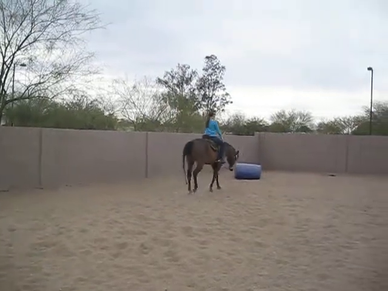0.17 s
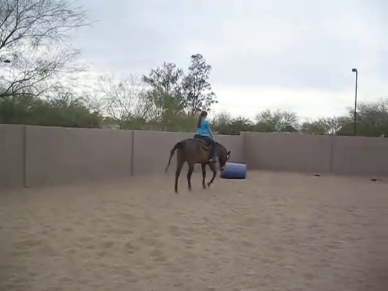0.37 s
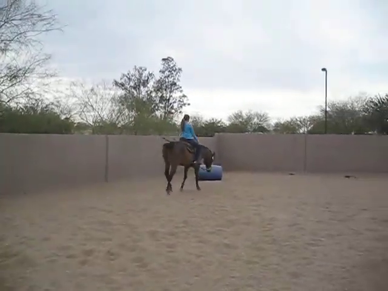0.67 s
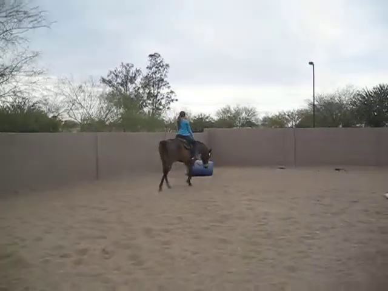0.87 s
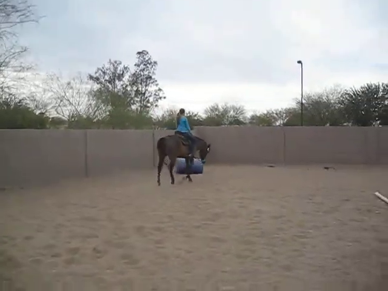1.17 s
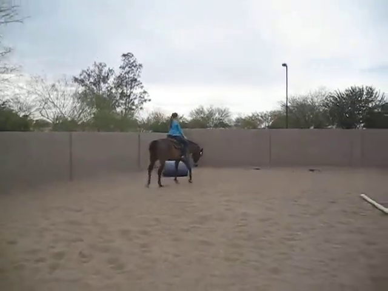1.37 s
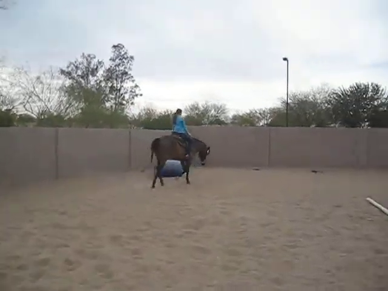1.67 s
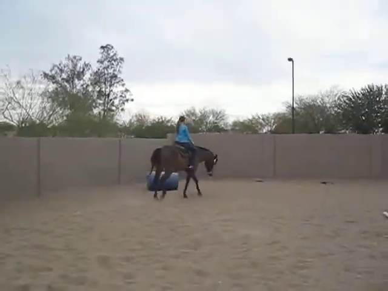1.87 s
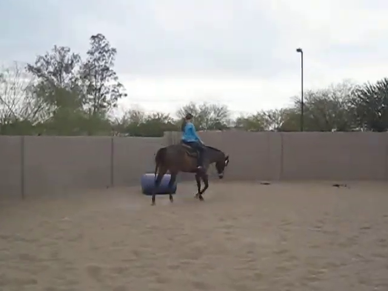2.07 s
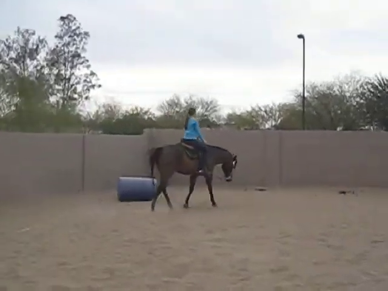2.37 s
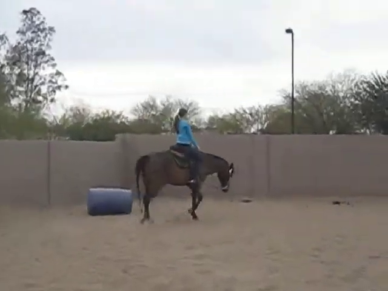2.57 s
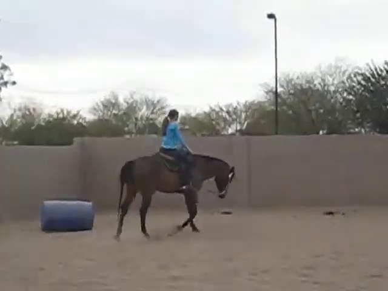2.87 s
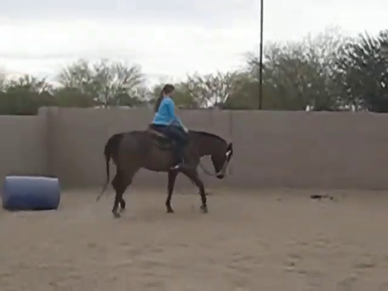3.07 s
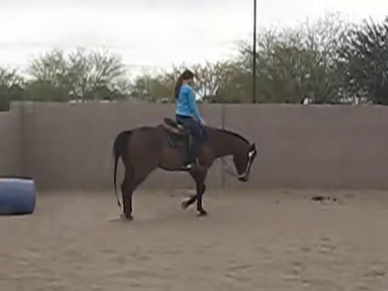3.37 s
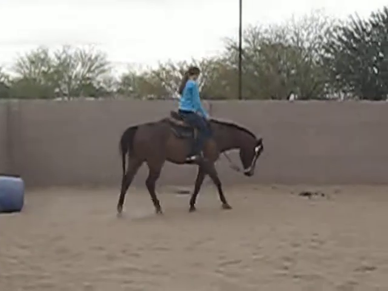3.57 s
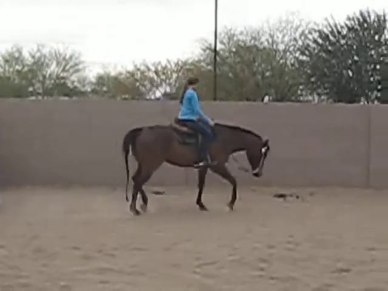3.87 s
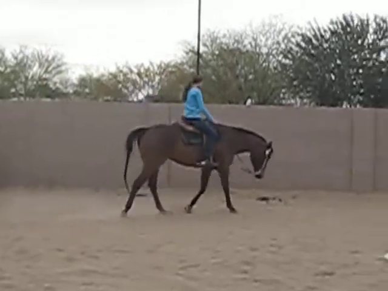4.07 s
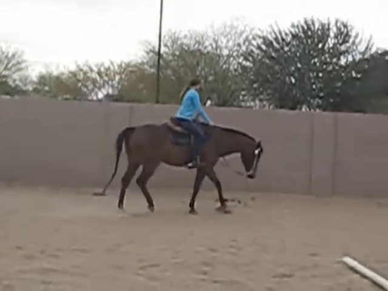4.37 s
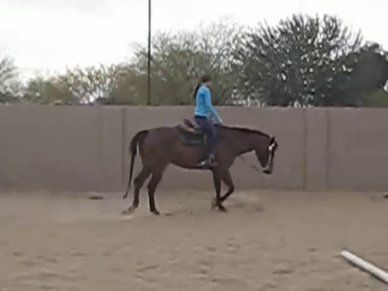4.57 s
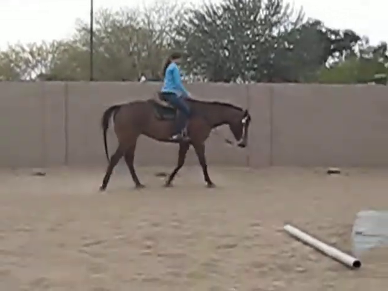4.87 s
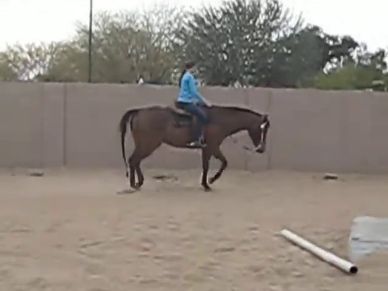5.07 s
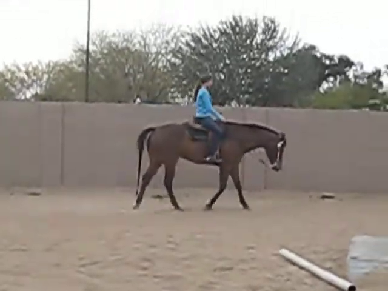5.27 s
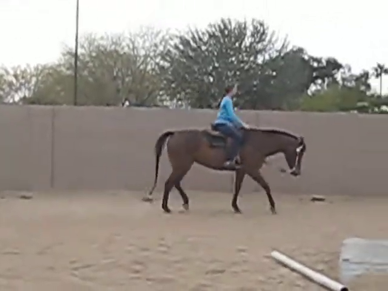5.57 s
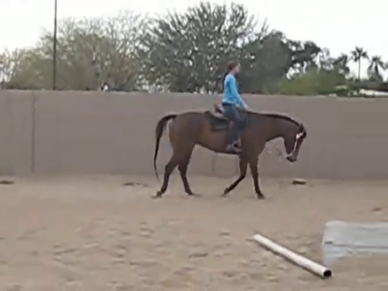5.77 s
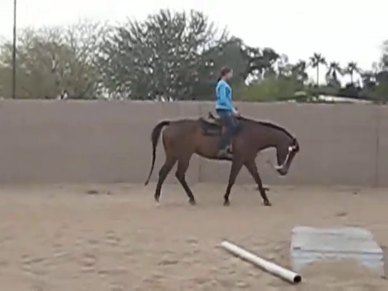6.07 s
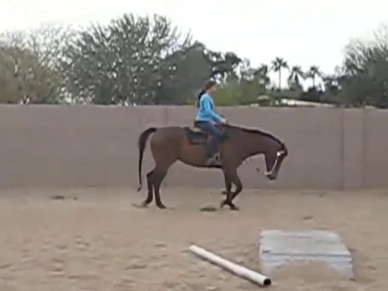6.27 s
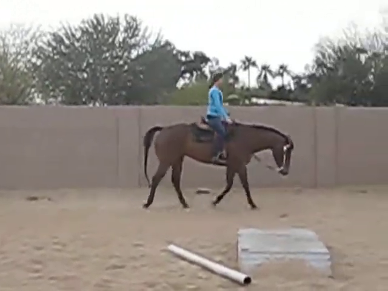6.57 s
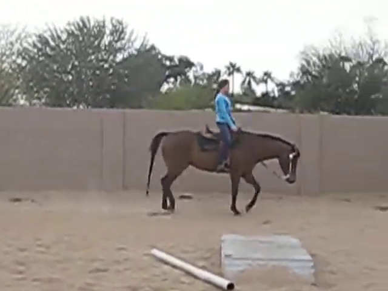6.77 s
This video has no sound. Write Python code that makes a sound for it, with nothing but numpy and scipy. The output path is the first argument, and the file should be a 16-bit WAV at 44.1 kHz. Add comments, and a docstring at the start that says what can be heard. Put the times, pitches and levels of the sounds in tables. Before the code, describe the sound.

A distant horse walks on sand, heard as small, uneven bursts of grainy hiss with little hoof thud, over a smooth, gently swelling far road roar. From 0.2 s low wind pushes flutter on the hand-held microphone, strongest around 0.5 and 1 s. Between 1 and 1.8 s a sleeve rubs close by in dry, dense grains, with light ticks and a hard plastic double snap at 1.53 s. Crisper sand scuffs resume from 1.9 s; a faint high chirp comes at 2.2 s. At 3.01 s a small snap precedes the loudest sharp clacks at 3.04 s, leaving a thin metallic spring ring. Four short buzzy bird whistles fall between 3.65 and 4.07 s, with two much fainter ones near 5.4 and 5.6 s. Fine grit crackles at 4.3-4.7 s. Scuffs stand out at 4.05, 5.13 and 5.48 s. Wind buffets again from 5.5 to about 6.6 s, then quiet steps and road remain until 6.9 s.

```python
"""A horse walks on a sand arena, far from a hand-held camera: bursts of grainy noise, over filtered road roar.
From 0.2 s gusts buffet the microphone as short low pushes with noisy wakes; they return near 5.5 s.
At 1 to 1.8 s a sleeve rustles close by as dense grains; light ticks fall, the housing snaps as ringing modes.
At 2.2 s a faint high chirp; at 3 s harder snaps and a ringing spring; to 5.6 s a bird's buzzes and whistles.
Fine grit crackles underfoot as sparse noise grains, strongest from 4.3 to 4.7 s."""
import sys
import numpy as np
from scipy import signal
from scipy.fft import rfft, irfft, next_fast_len
from scipy.io import wavfile
from scipy.ndimage import uniform_filter1d

SR = 44100
rng = np.random.default_rng(int(sys.argv[2]) if len(sys.argv) > 2 else 0)


def store_pcm(level_fs):
    """Save levels as 16-bit WAV."""
    pcm = np.round(np.clip(level_fs, -1, 1) * 32767).astype(np.int16)
    wavfile.write(sys.argv[1], SR, np.atleast_2d(pcm).T)


N = 305613


def amp(db):
    """Amplitude factor of a level in dB."""
    return 10 ** (np.asarray(db) / 20)


def evened(x):
    """Scales a signal to unit RMS."""
    return x / np.sqrt(np.mean(x ** 2) + 1e-20)


def curve(rows):
    """Columns of a table at every sample; the first column is time."""
    s, *columns = np.transpose(rows)
    return [np.interp(np.arange(N) / SR, s, c) for c in columns]


def coloured(x, points):
    """Applies a spectrum given on a log-frequency axis."""
    f, db = np.transpose(points)
    size = next_fast_len(len(x))
    hz = np.fft.rfftfreq(size, 1 / SR)
    gain = amp(np.interp(np.log(hz + 1), np.log(f), db))
    return irfft(rfft(x, size) * gain, size)[:len(x)]


def band(x, lo_hz, hi_hz):
    """Keeps the band between two frequencies."""
    return signal.sosfilt(signal.butter(2, [lo_hz, min(hi_hz, 21000)], "band", fs=SR, output="sos"), x)


def highpass(x, order, hz):
    """Keeps what lies above a frequency."""
    return signal.sosfilt(signal.butter(order, hz, "high", fs=SR, output="sos"), x)


def wobble(hz):
    """Random wander of unit RMS, slower than about the given frequency."""
    f = np.fft.rfftfreq(N, 1 / SR)
    return evened(irfft(rfft(rng.standard_normal(N)) / (1 + (f / hz) ** 4), N))


def gritty(per_s, spread_db, smooth):
    """Noise with grains of uneven size standing out."""
    size = amp(spread_db * np.minimum(rng.exponential(1, N), 4))
    size = size * (rng.random(N) < per_s / SR)
    grains = evened(size * rng.standard_normal(N))
    return evened(grains + smooth * rng.standard_normal(N))


def patchy(x, depth_db):
    """Raises and lowers random patches of time and frequency."""
    z = signal.stft(x, nperseg=512)[2]
    patches = uniform_filter1d(rng.standard_normal(z.shape), size=9, axis=0)
    patches = evened(uniform_filter1d(patches, size=12, axis=1))
    return evened(signal.istft(z * amp(depth_db * patches), nperseg=512)[1][:N])


def split(x, points):
    """Coloured noise as a treble and a lower part, both scaled to bring the treble to unit level."""
    x = coloured(x, points)
    high = highpass(x, 4, 7800)
    return high / high.std(), band(x, 180, 5440) / high.std()


def add(mix, s, sound):
    """Adds a sound into the mix from the given second on."""
    start = round(s * SR)
    part = mix[start:start + len(sound)]
    part += sound[:len(part)]


# distant road: (time [s], level [dB], weight of the part above 1700 Hz [dB])
ROAD_LEVEL = [(0.0, -52, -7), (0.89, -49.5, 2), (1.16, -47, 3.5), (1.87, -48.5, 1), (2.91, -45, -6),
              (3.05, -44, 4.5), (3.2, -42, 2), (3.4, -45, -3), (4.4, -44, 3.5), (5.11, -47.5, 2.5),
              (5.48, -49, 0), (5.79, -47, 5.5), (6.5, -47.5, -3.5), (6.93, -46.5, -9)]
# spectrum of the tyre roar: (frequency [Hz], density [dB])
ROAD_SPECTRUM = [(30, -24), (80, -15), (170, -10), (330, -18.5), (520, -3.5), (740, -1.5), (930, 0.5),
                 (1150, -4.5), (2100, -8), (2700, -12.5), (3500, -19.5), (6400, -28), (15000, -40)]


def road():
    """Smooth tyre roar that swells a little; its upper part comes and goes with the passing traffic."""
    db, upper_db = curve(ROAD_LEVEL)
    roar = coloured(rng.standard_normal(N), ROAD_SPECTRUM)
    upper = highpass(roar, 2, 1700)
    traffic = roar + (amp(upper_db) - 1) * upper
    swell = amp(db + 0.67 * wobble(2))
    return swell * traffic / np.std(band(roar, 490, 1340))


# wind on the microphone between the buffets: (time [s], gust level before the layer offsets [dB])
GUSTS = [(0.0, -48), (0.19, -49), (0.3, -42.5), (0.58, -32), (0.8, -34), (1.04, -30.5), (1.2, -37),
         (1.31, -32.5), (1.38, -46), (2.9, -51), (4.4, -49), (4.5, -43), (4.9, -48), (5.08, -45.5),
         (5.3, -44), (5.5, -45), (5.78, -36), (6.05, -39), (6.3, -36), (6.45, -41), (6.93, -49)]
# single buffets within the gusts: (time [s], strength before the part offsets [dB], pitch [Hz])
EDDIES = [(0.215, -27, 99.6), (0.399, -23, 131), (0.456, -23.5, 171), (0.514, -15, 172), (0.527, -17, 240),
          (0.546, -19, 250), (0.557, -22, 318), (0.599, -43, 124), (0.631, -30, 110), (0.68, -22.5, 191),
          (0.83, -24.5, 194), (0.848, -25, 242), (0.955, -13, 263), (0.966, -14, 227), (0.975, -11, 230),
          (0.99, -34, 270), (1.011, -11.5, 164), (1.033, -8.5, 232), (1.046, -21, 110), (1.06, -36, 205),
          (1.082, -34, 205), (1.235, -30, 100), (1.265, -19, 240), (1.289, -25, 141), (3.427, -35, 150),
          (3.699, -27, 96), (3.712, -28, 110), (4.461, -32, 151), (5.057, -32, 92), (5.501, -21, 148),
          (5.591, -25, 88.8), (5.703, -20.5, 219), (5.718, -19.5, 205), (5.735, -31, 223),
          (5.739, -21.5, 680), (5.758, -25, 294), (5.769, -15.5, 377), (5.799, -14.5, 172),
          (5.825, -18, 252), (5.858, -18, 221), (5.881, -22, 253), (5.941, -20.5, 250), (5.981, -19.5, 127),
          (6.003, -32, 170), (6.024, -32, 216), (6.122, -24, 95.5), (6.166, -29, 213), (6.19, -29, 110),
          (6.272, -24, 87), (6.299, -25, 120), (6.329, -32, 96.9), (6.496, -21.5, 305), (6.54, -24, 180),
          (6.658, -33, 96)]
DULL_DB, BRIGHT_DB = -9.5, -18.5  # layers relative to the gust
CALM_DB, BRIGHT_CALM_DB = -68.5, -61  # floors of the dull and bright layers in calm air
PUSH_DB, EDGE_DB = -5, -28.5  # the push and its sharp edge, relative to the strength
WAKE_DB, BRIGHT_WAKE_DB, WAKE_S = -24, -7, 0.012  # wake, its bright layer beside it, time to its peak
WAKE_SPLIT_HZ, WAKE_TILT_DB = 149, 9.5  # wakes of higher pitch are brighter, by this much per octave


def wind():
    """Lumpy pressure noise in a dull and a bright layer; eddies land as short pushes and leave a turbulent wake."""
    gust_db = curve(GUSTS)[0]
    dull_gain = amp(gust_db + DULL_DB) + amp(CALM_DB)
    bright_gain = amp(gust_db + BRIGHT_DB) + amp(BRIGHT_CALM_DB)
    pushes, t = np.zeros(N), np.arange(200) / SR
    edge = np.sin(np.pi * t / t[-1]) ** 2 * np.sin(2 * np.pi * 650 * t)
    age = np.arange(SR // 4) / SR / WAKE_S
    wake = age * np.exp(1 - age)
    for (s, db, hz), phase in zip(EDDIES, rng.random(len(EDDIES))):
        turns = np.arange(0, 2.1, hz / SR)
        done = turns / turns[-1]
        push = done ** 0.85 * (1 - done) ** 2.4  # quick rise, slower fall
        push = push / push.max() * np.sin(2 * np.pi * (turns + phase))
        add(pushes, s, amp(db + PUSH_DB) * push)
        add(pushes, s + 0.00244, amp(db + EDGE_DB) * edge)
        tilt_db = WAKE_TILT_DB * np.log2(hz / WAKE_SPLIT_HZ)
        add(dull_gain, s, amp(db + WAKE_DB - tilt_db) * wake)
        add(bright_gain, s, amp(db + WAKE_DB + BRIGHT_WAKE_DB + tilt_db) * wake)
    pushes = band(pushes, 81, 2200)  # the capsule vents slow pressure
    noise = rng.standard_normal(N)
    dull = evened(band(band(noise, 57, 231), 58.6, 154.6))
    bright = evened(band(band(noise, 117, 358), 148, 870))
    dull *= dull_gain * amp(2.2 * wobble(64))
    bright *= bright_gain * amp(5.0 * wobble(43))
    # slow drift of air pressure
    drift = amp(0.41 * gust_db - 43.0 + 1.5 * wobble(3.8)) * evened(band(noise, 30, 44))
    return pushes + dull + bright + drift


# fine crackle of grit underfoot: (time [s], level [dB])
GRIT_LEVEL = [(0, -59.5), (4.15, -75), (4.3, -52.5), (4.7, -51.5), (5.0, -69), (5.2, -75), (6.93, -59)]


def crackle():
    """Sparse small stones cracking in the sand."""
    grains = gritty(90, 2.4, smooth=0.66)
    return amp(curve(GRIT_LEVEL)[0]) * evened(band(grains, 1500, 5900))


# bird: (whistle start [s], length [s], level before the harmonic gains [dB], pitch [Hz], sag [Hz],
#        closing flick [Hz])
WHISTLES = [(3.664, 0.026, -37, 2570, 6, 270), (3.783, 0.026, -35, 2570, 106, 140),
            (3.948, 0.028, -35, 2490, 122, 70), (4.042, 0.024, -36, 2365, 74, -70),
            (5.362, 0.021, -49.5, 2470, 7, 17), (5.584, .023, -52, 2360, -20, 20)]
# gains of the fundamental and its overtones, in rising order: [dB]
HARMONICS_DB = [4, -19, -23]
SCOOP, SCOOP_S, SWELL_DB = .18, .004, -5  # starts this fraction below pitch and this much quieter
FADE_S, FADE_DB = .007, -7  # the closing flick, and how far it fades
BUZZ_S, BUZZ_LEAD_S, BUZZ_DB, BUZZ_HZ = 0.027, 0.023, -3.5, 2640  # rough buzz that leads each whistle


def bird():
    """A rough buzz, then a short whistle with weak overtones."""
    out, flutter, count = np.zeros(N), wobble(300), round(BUZZ_S * SR)
    draws = rng.standard_normal((len(WHISTLES), 1500))
    for (s, length, db, hz, sag_hz, flick_hz), noise in zip(WHISTLES, draws):
        t = np.arange(0, length, 1 / SR)
        corners = [0, SCOOP_S, length - FADE_S, length]
        pitch = np.interp(t, corners, [hz * (1 - SCOOP), hz, hz - sag_hz, hz - sag_hz + flick_hz])
        pitch *= 1 + 0.0097 * flutter[round(s * SR):][:len(t)]
        turns = np.cumsum(pitch) / SR
        tone = sum(amp(g) * np.sin(2 * np.pi * (k + 1) * turns) for k, g in enumerate(HARMONICS_DB))
        level = np.sqrt(2) * amp(db + np.interp(t, corners, [SWELL_DB, 0, 0, FADE_DB]))
        add(out, s, level * tone * signal.windows.tukey(len(t), .1))
        buzz = band(noise, BUZZ_HZ * 0.97, BUZZ_HZ * 1.31)
        buzz = evened(band(buzz, BUZZ_HZ * 0.77, BUZZ_HZ * 0.99))
        rough = buzz + amp(-14.0) * evened(band(noise, 6200, 6800))
        rough = rough[-count:] * signal.windows.tukey(count, .6)
        add(out, s - BUZZ_LEAD_S, amp(db + BUZZ_DB) * rough)
    return out + amp(-21) * np.roll(out, round(0.016 * SR))  # echo off the arena wall


# sleeve sliding near the microphone: (time [s], relative level [dB], weight of the low rub [dB])
SLEEVE_STROKES = [(0.99, -59, 6), (1.02, -45, -4), (1.06, -58, -5), (1.106, -43, 7.5), (1.198, -48, 6),
                  (1.242, -35, 2.5), (1.29, -46, 11), (1.364, -30.5, -2), (1.48, -36.5, 3.5),
                  (1.53, -32, 11.5), (1.558, -29, 2.5), (1.704, -48, 8), (1.8, -77, 3)]
# spectrum of the rubbing cloth: (frequency [Hz], density [dB])
CLOTH_SPECTRUM = [(500, -21), (1200, -8.5), (1800, -2.5), (2350, -0.5), (3200, -6), (4400, -4),
                  (5400, -7.5), (9000, -7.5), (9800, -0.5), (10600, -5.5), (12000, 0.5), (15000, -2.5)]


def sleeve():
    """Fibres dragging: dense grains under the stroke."""
    db, low_db = curve(SLEEVE_STROKES)
    t = np.arange(N) / SR
    inside_s = np.minimum(t - SLEEVE_STROKES[0][0], SLEEVE_STROKES[-1][0] - t)
    on = np.clip(inside_s / 0.016, 0, 1)
    fibres = patchy(gritty(4000, 6.3, smooth=1.75), 1.36)
    high, low = split(fibres, CLOTH_SPECTRUM)
    return on * amp(db - 1.5 + 1.45 * wobble(56)) * (high + amp(low_db) * low)


# light ticks, and at 2.21 s a faint high chirp: (time [s], peak [dB], approximate centre [Hz])
LIGHT_TICKS = [(1.109, -32, 11000), (1.125, -32, 9000), (1.275, -25, 3000), (1.285, -21, 2180),
               (1.476, -22, 2380), (1.512, -30, 2340), (2.069, -30, 2520), (2.081, -31.5, 2380),
               (2.214, -27, 12000), (2.215, -32.5, 5000), (2.236, -34.5, 5570), (2.309, -31, 11000),
               (2.719, -36, 11000), (3.578, -38, 900), (3.866, -36, 3900), (4.055, -36, 5000),
               (4.372, -32, 7000), (5.2, -35, 9000), (6.814, -35, 9000)]
# hard snaps of the housing: (time [s], blow [dB], weight of the low [dB], middle [dB] and high modes [dB],
#                             growth time of the noise swell before it [s])
HOUSING_SNAPS = [(1.5271, 3.5, -22, 16, 10, 0.0035), (1.52805, 2.5, -9, 14, -16, 0.0028),
                 (3.0088, -13, 8.5, 2, 3, .001), (3.038, 2.5, 9, 2, 9.5, 0.0053),
                 (3.0391, 8.5, -13, 1.4, 6, 0.0016), (3.04, 7, 8, 2, 4, 0.0011),
                 (3.0428, 6.5, -2, 1, 2, 0.0011)]
# modes of the plastic shell: (frequency [Hz], level before the weights [dB], t60 [s])
SHELL_MODES = [(144, -41, .025), (298, -43, 0.043), (754, -12, 0.013), (1343, -6.5, 0.018),
               (1770, -19, 0.0028), (1890, -12, 0.038), (2100, 11, 0.0054), (2560, 1.5, 0.0073),
               (2640, -7.5, 0.0043), (3200, 7, 0.0029), (3540, -18, 0.0081), (4440, -11, 0.017),
               (5590, 4, 0.0021), (6700, -24, 0.002), (9150, -13, 0.007), (11400, -9, 0.0059),
               (11530, -17.5, 0.0038), (14500, 2.5, 0.0015)]
# modes of a metal spring left ringing by the last snap: (frequency [Hz], level [dB], t60 [s])
SPRING_MODES = [(2266, -54, .9), (2342, -51, 1.), (2842, -56, .5), (3160, -52, .45), (3914, -45, .65),
                (4576, -51, .55)]
SWELL_IN_DB = -18  # noise swell before a snap, relative to the blow


def ticks_and_snaps():
    """Ticks are tiny bursts; a snap rings the shell after a short noise swell, the last one rings a spring."""
    out, t = np.zeros(N), np.arange(SR // 2) / SR
    tick_shape = np.minimum(t[:400] / .0015, 1) * amp(-60 * t[:400] / .014)
    for (s, db, hz), noise in zip(LIGHT_TICKS, rng.standard_normal((len(LIGHT_TICKS), 400))):
        burst = band(noise * tick_shape, hz * .55, hz * 1.6)
        add(out, s, amp(db) * burst / abs(burst).max())

    def ringing(modes):
        """Each mode is a sine that dies away by its own t60."""
        return np.array([amp(db - 60 * t / t60) * np.sin(2 * np.pi * hz * t) for hz, db, t60 in modes])

    shell = ringing(SHELL_MODES)
    # low, middle, high; modes between 1500 and 2300 Hz take no weight
    groups = np.array([(hz < 1500, 2300 < hz < 4000, hz >= 4000) for hz, *_ in SHELL_MODES])
    draws = rng.standard_normal((len(HOUSING_SNAPS), 1500))
    for (s, db, *weights_db, growth_s), draw in zip(HOUSING_SNAPS, draws):
        ring = amp(groups @ weights_db) @ shell * np.minimum(t / 0.00026, 1)
        ring /= abs(ring).max()
        add(out, s, amp(db) * ring)
        swell_noise = draw * np.exp(-t[:1500][::-1] / growth_s)
        swell = signal.oaconvolve(swell_noise, ring) / np.linalg.norm(ring)
        add(out, s - 1500 / SR, amp(db + SWELL_IN_DB) * swell)
    add(out, HOUSING_SNAPS[-1][0], ringing(SPRING_MODES).sum(axis=0))
    return out


# hooves throwing sand: (landing time [s], strength [dB], t60 [s], weight of the low grit [dB])
HOOF_SCUFFS = [(0.0235, -31, 0.072, -8), (0.0772, -38, 0.11, -3), (0.137, -30, 0.2, -3),
               (0.3566, -38, 0.18, -17), (0.4793, -38.5, 0.14, -4), (0.5192, -37, 0.17, -9),
               (0.5955, -41.5, 0.23, 0), (0.6674, -36, 0.038, -7), (0.7721, -34.5, 0.28, -7),
               (0.8294, -43, 0.12, 5), (1.876, -31, 0.2, -0.5), (2.065, -29, 0.073, 0),
               (2.2885, -32, 0.16, -6), (2.455, -36, 0.22, 2), (2.5875, -37.5, 0.18, 3.5),
               (2.6928, -34, 0.073, 1), (2.8484, -36.5, 0.15, 1), (3.1692, -37, 0.13, -7),
               (3.266, -42, 0.27, 4.5), (3.4431, -37.5, 0.086, -10), (3.5897, -40, 0.11, -9),
               (3.6227, -38.5, 0.22, 2), (4.054, -28, 0.13, -6), (4.289, -42.5, 0.17, 8),
               (4.368, -31, 0.089, -7), (4.4544, -44.5, 0.48, 6), (4.8559, -40, 0.25, -2),
               (5.129, -27, 0.046, -3), (5.2006, -42, 0.13, 0), (5.271, -44.5, 0.38, 4.5),
               (5.479, -28.5, 0.023, -14), (5.5777, -34.5, 0.085, -19), (5.6705, -41, 0.31, -19),
               (5.9653, -33, 0.11, -6), (6.1439, -45, 0.17, 4), (6.3265, -45, 0.27, -2),
               (6.5291, -41.5, 0.42, 4.5), (6.7915, -49, 0.3, 6)]
# spectrum of the thrown sand: (frequency [Hz], density [dB])
SAND_SPECTRUM = [(300, -37), (1000, -11.5), (2500, 4), (5000, 0.5), (9000, -3.5), (15000, -2)]
DRAG_S, DRAG_DB = 0.015, -29  # growth time of the toe's drag; dB relative to the scuff's strength


def hooves():
    """The toe drags, then lands in a spray of grains with a quick start, over a faint steady hiss."""
    spray, grit = np.full(N, amp(-60.0)), np.full(N, amp(-59.0))
    t = np.arange(SR // 2) / SR
    for s, db, t60, low_db in HOOF_SCUFFS:
        scuff = amp(db - 11 - 60 * t / t60) * np.minimum(t / 0.0011, 1)
        drag = amp(db + DRAG_DB) * np.exp(-t[:SR // 50][::-1] / DRAG_S)  # the last 20 ms before landing
        scuff = np.maximum(scuff, drag[-1] * (t < .002))  # no gap between drag and landing
        shape = np.append(drag, scuff)
        add(spray, s - .02, shape)
        add(grit, s - .02, amp(low_db) * shape)
    sand = patchy(gritty(2500, 6.3, smooth=1.6), 0.66)
    high, low = split(sand, SAND_SPECTRUM)
    return amp(1.54 * wobble(23)) * (spray * high + grit * low)


def scene():
    """All sources together at the microphone."""
    return (road() + wind() + hooves() + sleeve() + ticks_and_snaps() + bird() + crackle())[None]


# overall colour, a narrow notch near 7.9 kHz and a lift near 12 kHz: (frequency [Hz], gain [dB])
COLOUR_RESPONSE = [(5500, 0), (7400, -4.5), (7900, -25.5), (8400, -3), (12300, 6), (15600, -7.5)]
TOP_HZ = 15750  # upper band limit


def record(dry):
    """Overall colour, gain control that ducks after loud sounds, overload, band limit."""
    x = coloured(dry[0], COLOUR_RESPONSE)
    power = uniform_filter1d(x ** 2, 330, origin=160)  # mean over the last 7.5 ms
    power_db = 10 * np.log10(abs(power) + 1e-12)
    fall = np.arange(N) * 145.0 / SR  # the held level falls by 145 dB a second
    held_db = np.maximum.accumulate(power_db + fall) - fall
    over_db = np.maximum(held_db + 27.0, 0)
    late = signal.lfilter([.004], [1, -(1 - .004)], over_db)  # the gain follows over a few ms
    x = np.clip(x / amp(0.5 * late), -.71, .71)
    lowpass = signal.firwin(1023, TOP_HZ, window=("kaiser", 12), fs=SR)
    return signal.oaconvolve(x, lowpass, "same")[None]


dry = scene()
out = record(dry)
store_pcm(out)
```